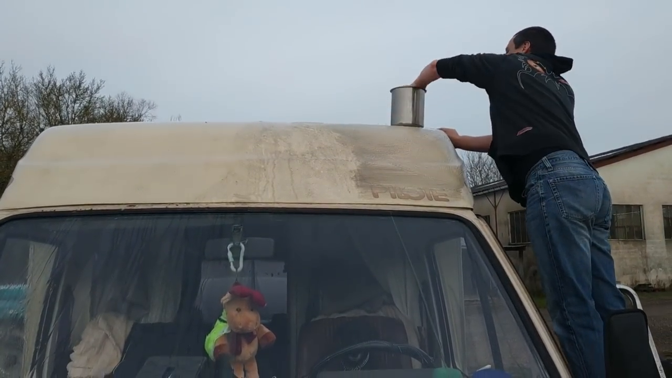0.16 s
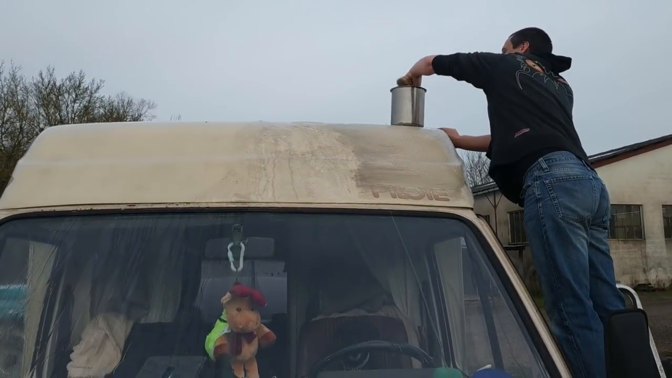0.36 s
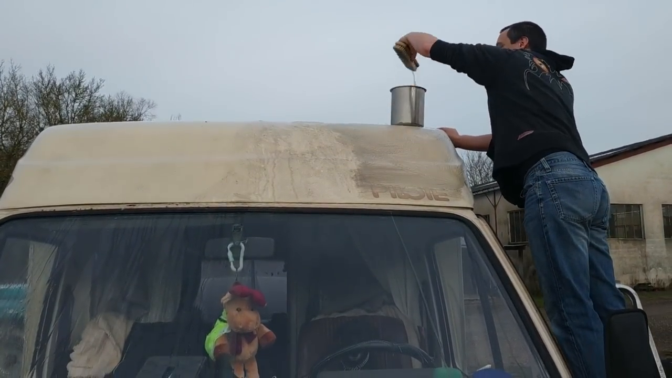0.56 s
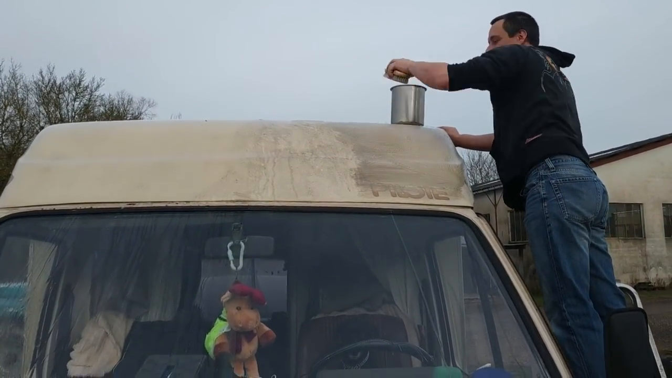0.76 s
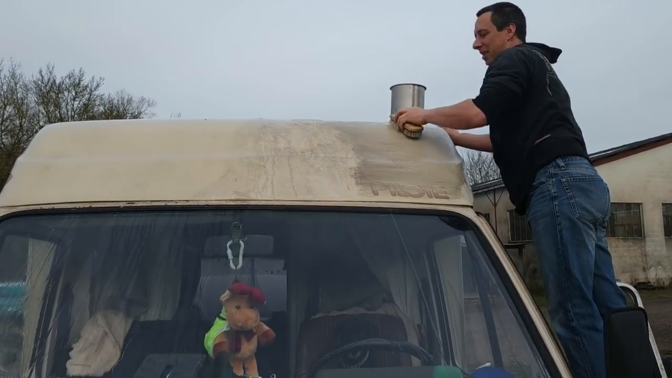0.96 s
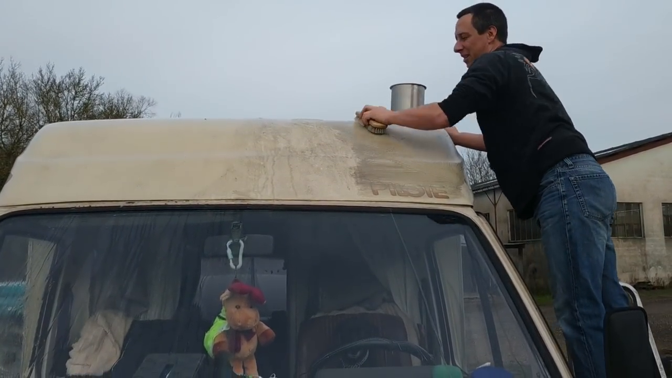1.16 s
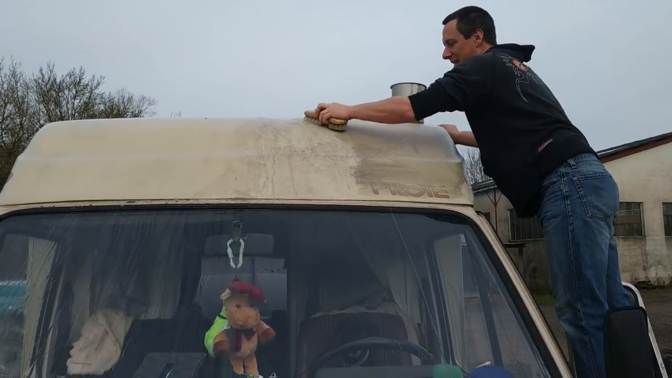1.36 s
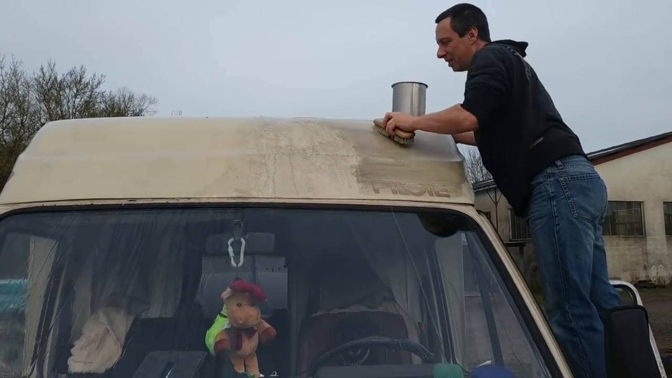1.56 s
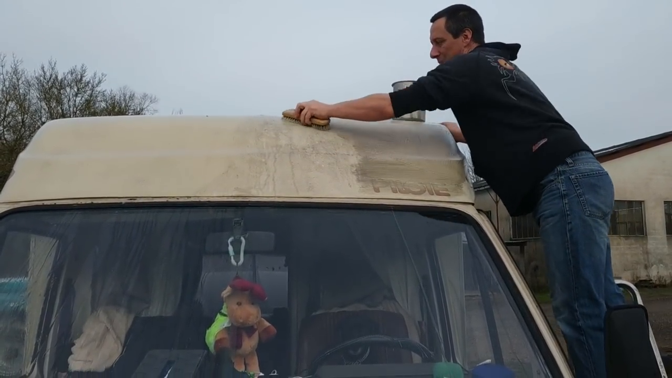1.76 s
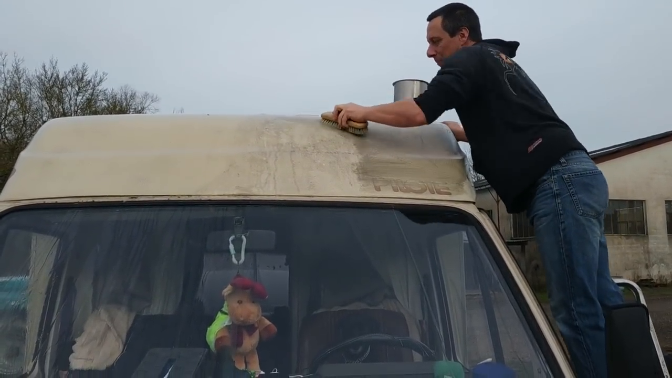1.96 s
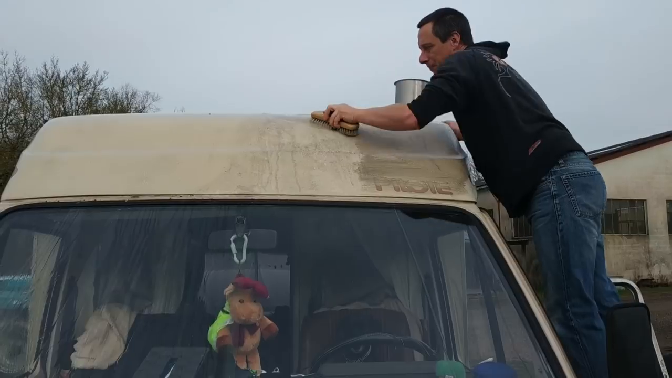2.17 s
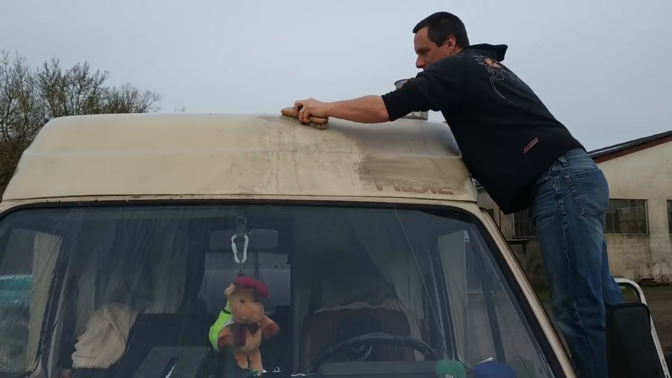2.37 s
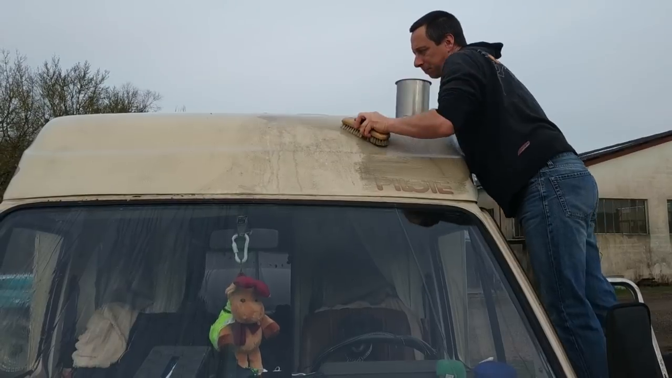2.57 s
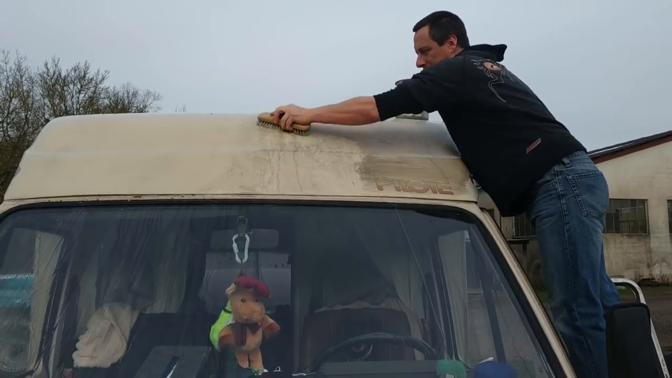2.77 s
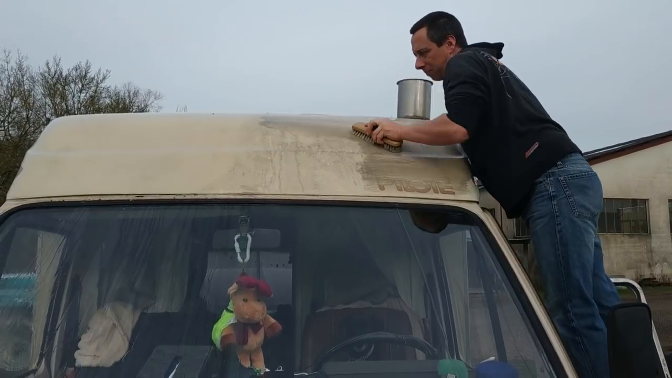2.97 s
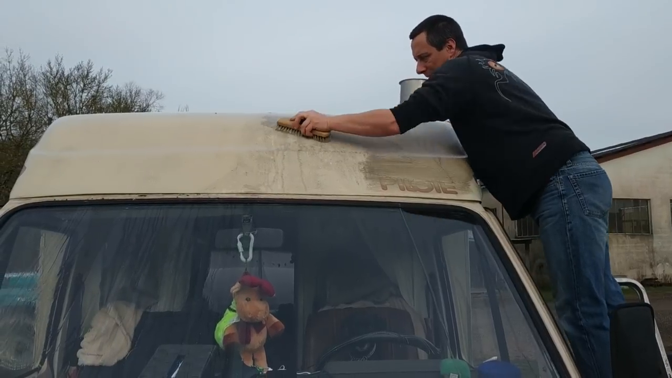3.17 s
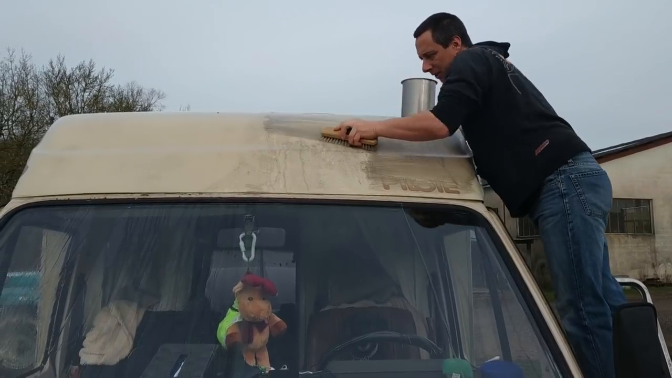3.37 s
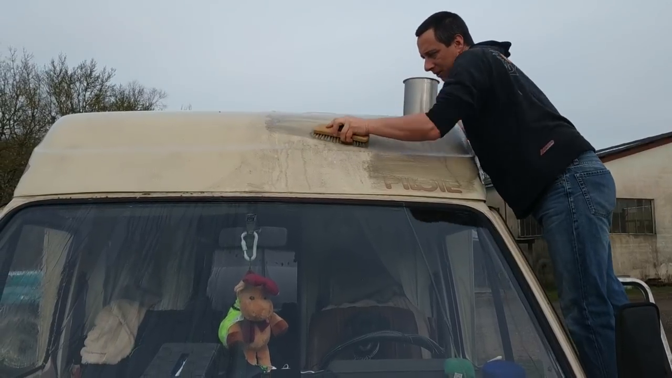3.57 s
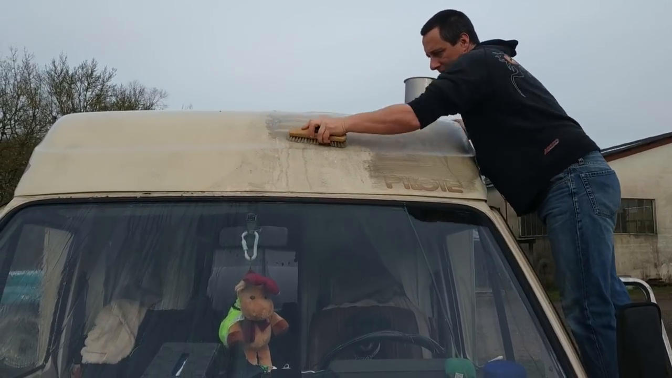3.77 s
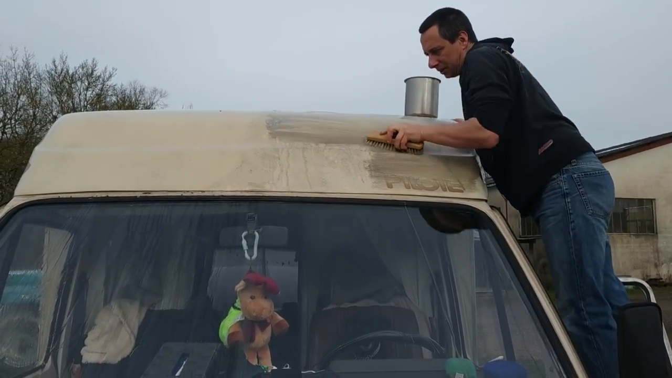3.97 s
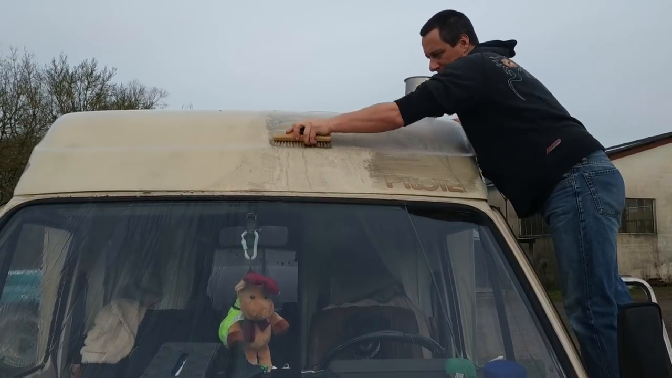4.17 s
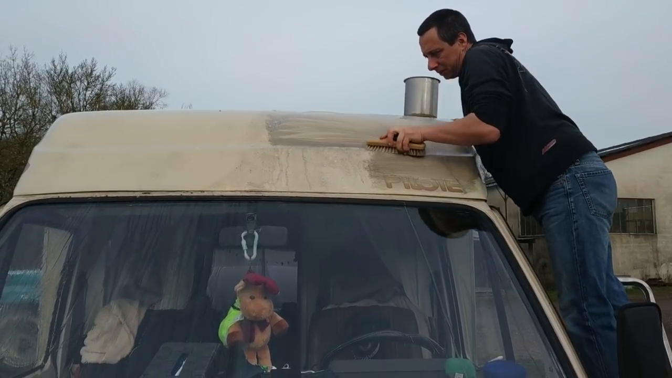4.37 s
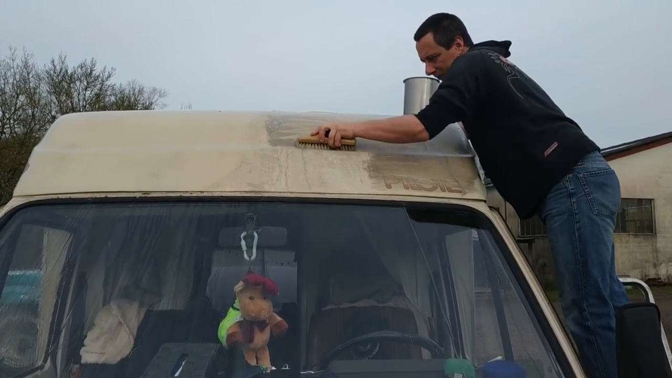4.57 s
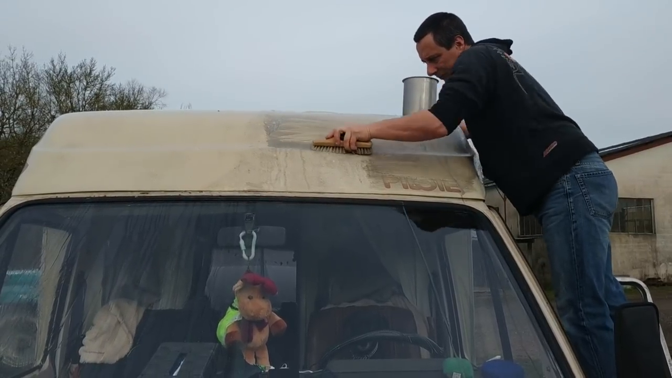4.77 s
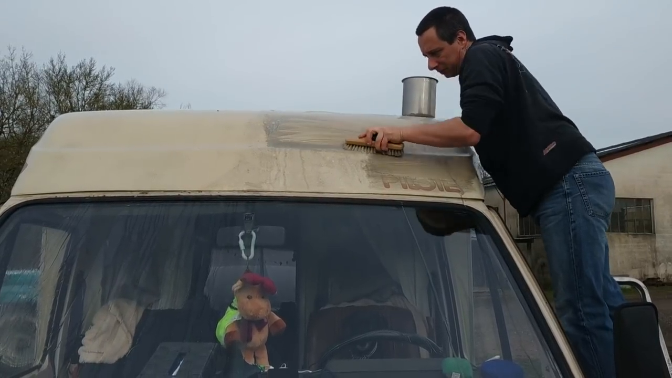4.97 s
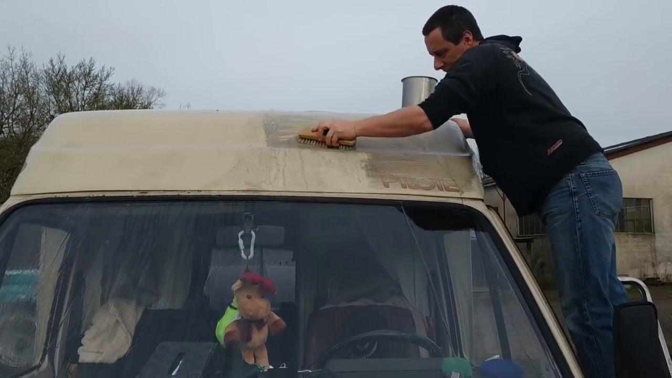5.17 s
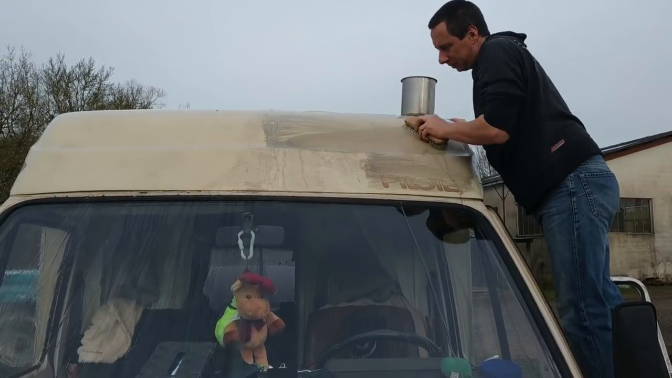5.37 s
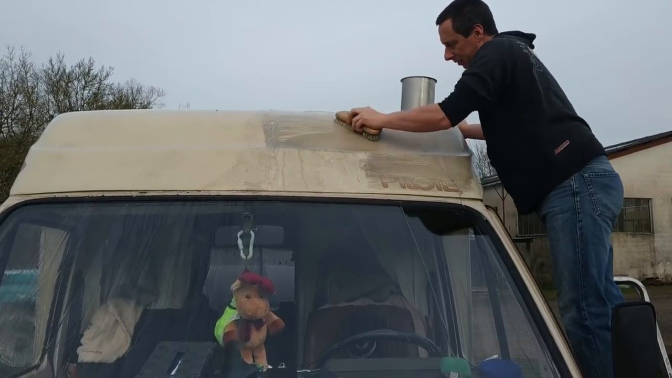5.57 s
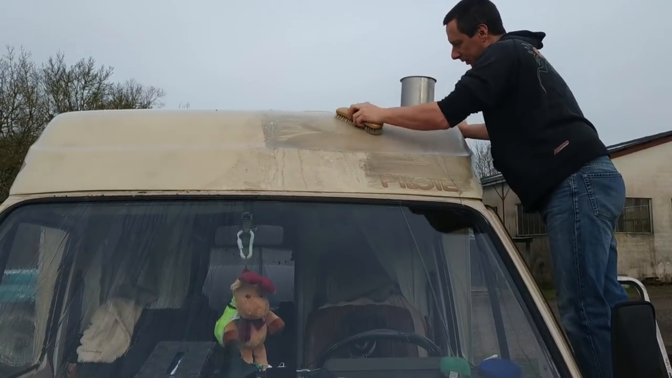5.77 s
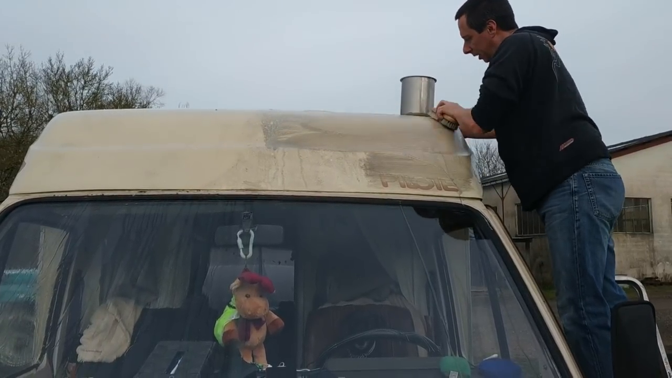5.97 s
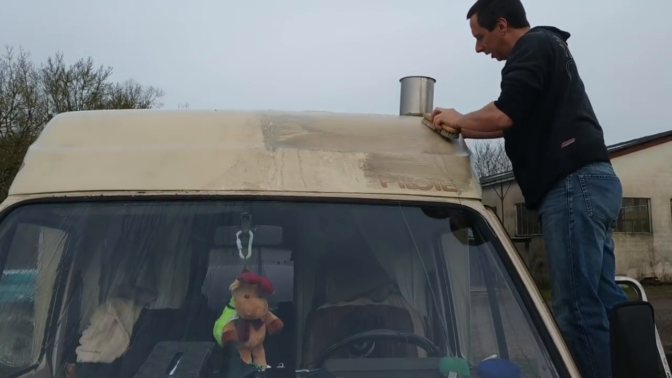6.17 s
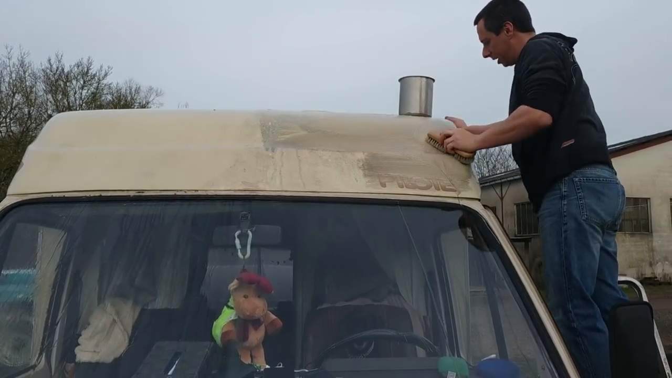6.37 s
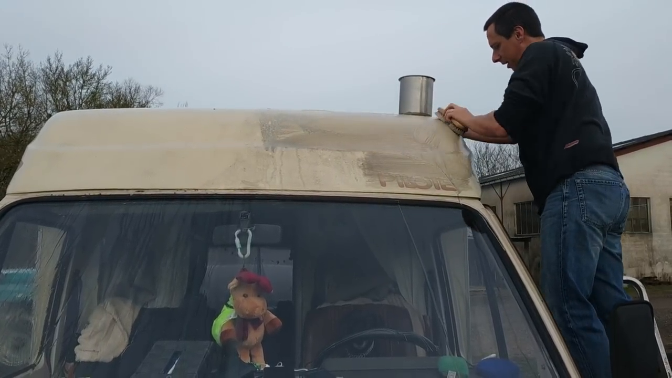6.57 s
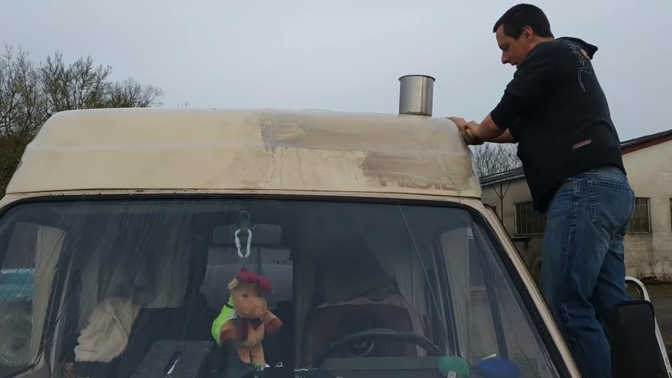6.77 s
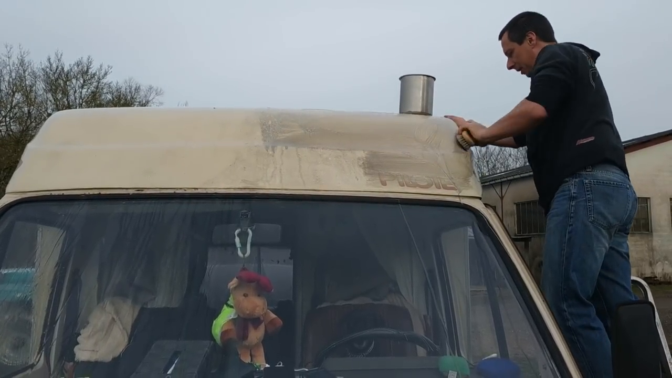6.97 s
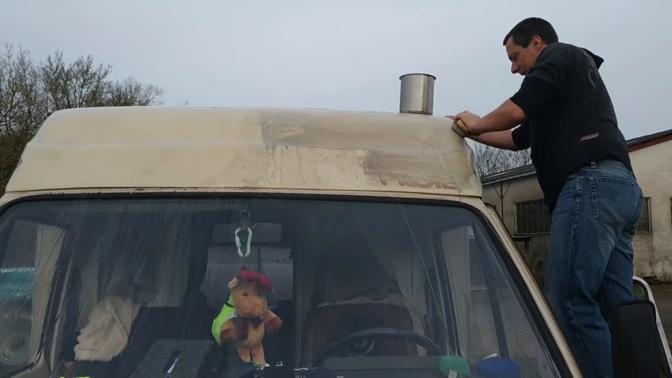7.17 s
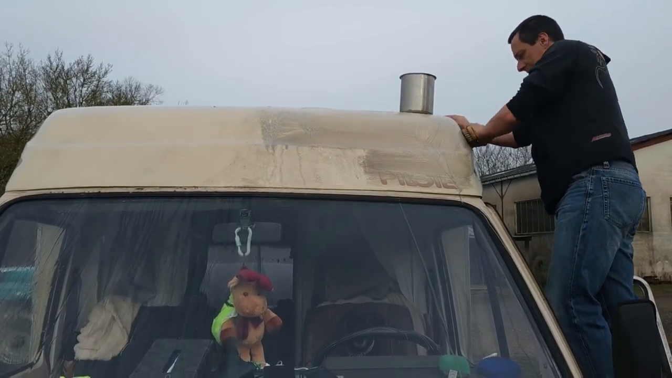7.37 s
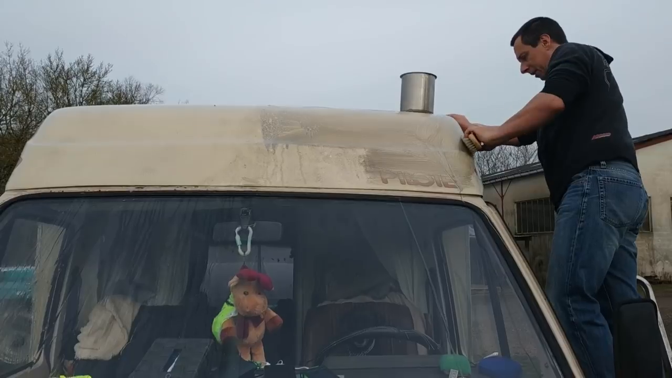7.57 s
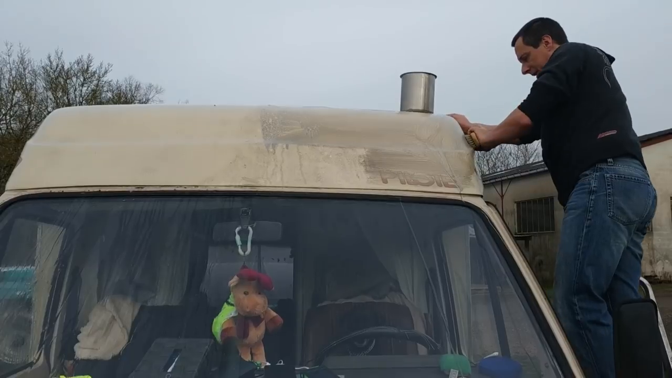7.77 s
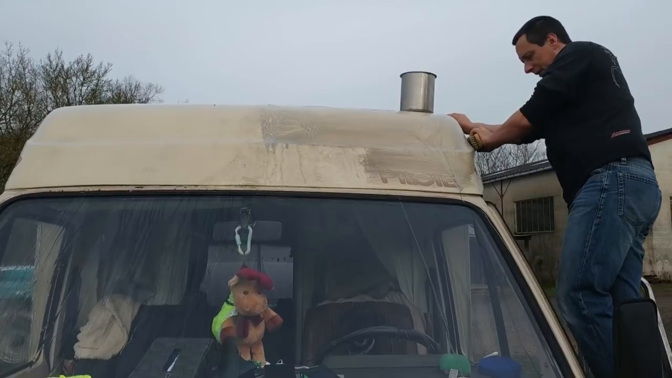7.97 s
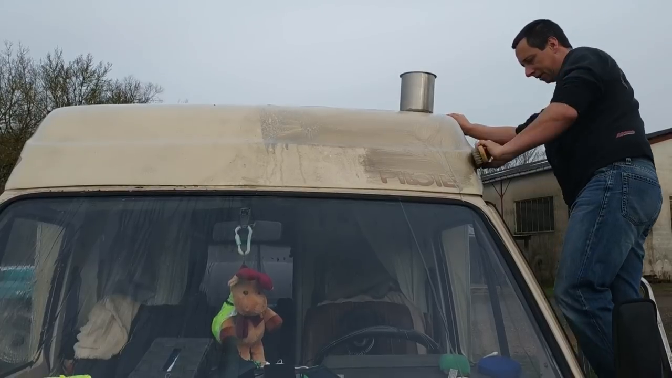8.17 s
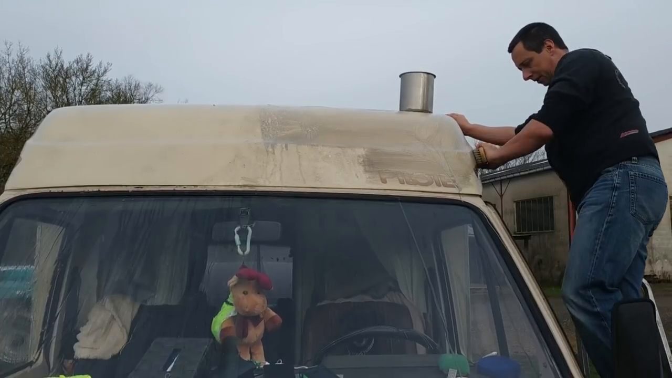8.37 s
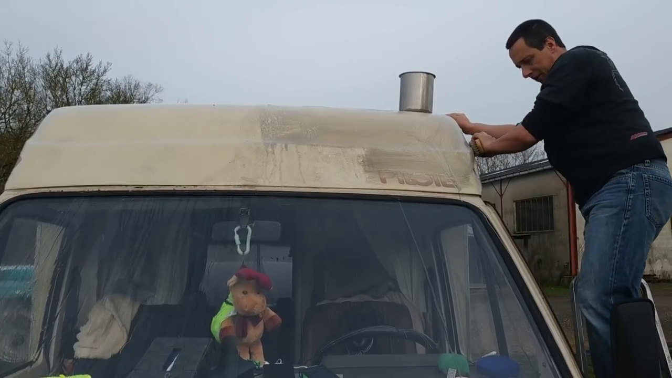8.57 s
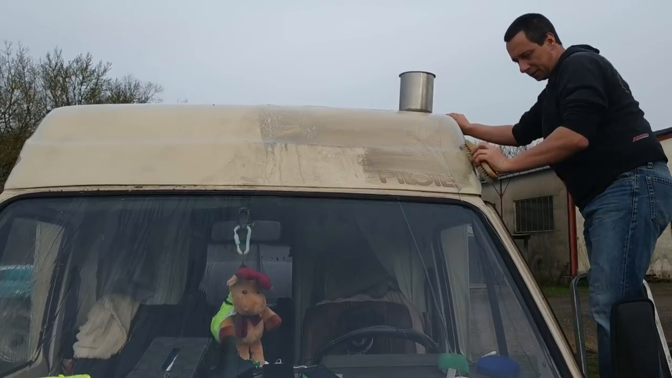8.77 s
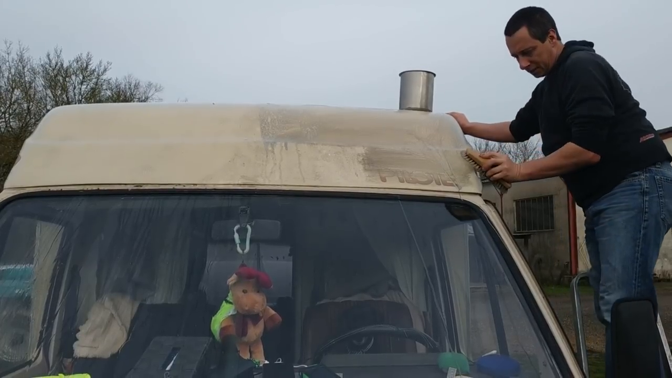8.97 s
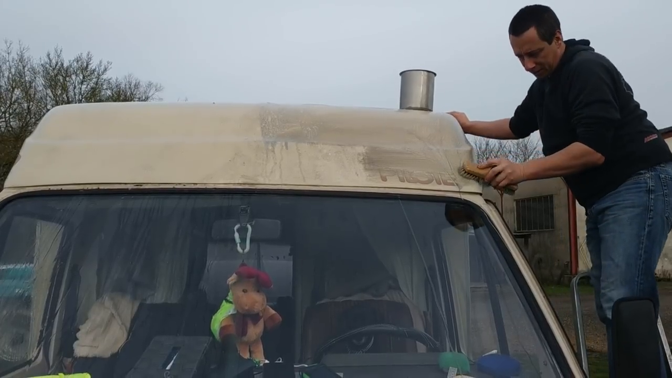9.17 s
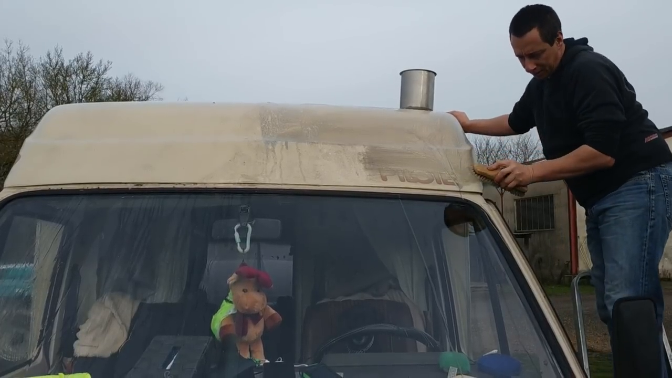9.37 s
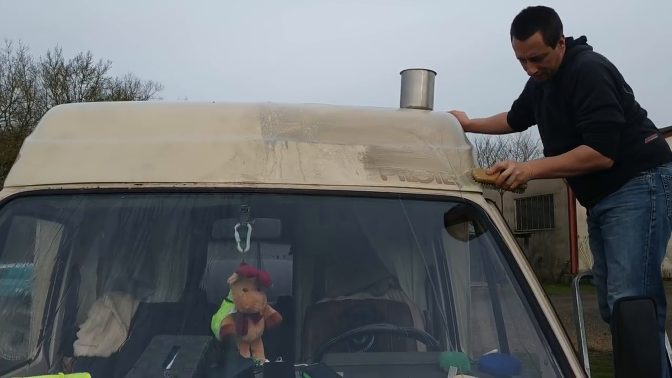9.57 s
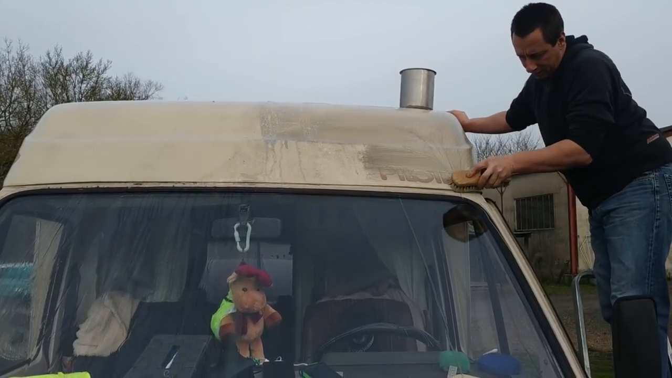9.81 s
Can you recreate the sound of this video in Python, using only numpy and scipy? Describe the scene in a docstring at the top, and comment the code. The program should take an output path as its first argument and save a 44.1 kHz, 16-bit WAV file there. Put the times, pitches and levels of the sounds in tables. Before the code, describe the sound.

A faint, distant outdoor rumble runs throughout. From 0.3 to 0.6 seconds a brush bumps a steel pot of water: small ringing clinks, splashes, bubbly plops climbing in pitch and dull knocks through the roof; another dip comes near 0.85. At 1.0 the brush lands with a bristly crack and compact hollow thud. Tentative strokes grow by 1.7 into vigorous scrubbing, around four strokes a second until 5: bright, dense hiss, stronger on pushes, with rattling judder and hollow drumming at turns, and sharper knocks between 2.2 and 4.9. Strokes weaken after 5, and a lighter landing falls at 5.9. From 6.1 the brush works round the corner, with softer, slower, raspier strokes and less drumming. A longer, fading sweep starts at 9.0, then short, quick strokes from 9.2 finish near 9.95. Close stereo, the hiss leaning left.

```python
"""A stiff hand brush, dipped in a steel pot of water, is set down on a van's roof and scrubbed to and fro, outdoors.
Its bristles hiss as many small random flicks; after each turn they judder, and kicks ring the hollow roof's modes.
The pot rings as decaying modes, with plops that climb in pitch. The left microphone hears more of the hiss.
After about six seconds the brush goes round to the roof's corner. A soft, distant rumble of noise lies beneath."""
import sys
import numpy as np
from scipy import signal
from scipy.fft import rfft, irfft, next_fast_len
from scipy.io import wavfile
from scipy.ndimage import uniform_filter1d, map_coordinates

SR = 44100
rng = np.random.default_rng(int(sys.argv[2]) if len(sys.argv) > 2 else 0)


def file_out(sig):
    """Save sig as 16-bit WAV at sys.argv[1]."""
    # one column per channel
    cols = np.atleast_2d(sig).T
    # limit, then scale
    lim = np.clip(cols, -1, 1)
    pcm = np.round(lim * 32767).astype(np.int16)
    wavfile.write(sys.argv[1], SR, pcm)


N = 433944

# strokes of the brush, pushed away and pulled back in turn:
# start_s, hiss_db (before the swell), speed_up_s, slow_down_s, judder_db (after the turn), judder_length_s
BRUSH_STROKES = [(1.143, -24, 0.093, 0.044, -43.5, 0.38), (1.464, -25, 0.041, 0.04, -37, 0.065),
                 (1.708, -21.5, 0.044, 0.065, -41, 0.14), (2.001, -19.5, 0.095, 0.053, -37, 0.088),
                 (2.228, -19.0, 0.038, 0.075, -33, 0.057), (2.464, -19.0, 0.086, 0.064, -32, 0.056),
                 (2.704, -17.5, 0.026, 0.077, -31, 0.042), (2.934, -19, 0.082, 0.057, -30.5, 0.057),
                 (3.174, -19, 0.031, 0.049, -32.5, 0.047), (3.393, -18.5, 0.071, 0.046, -35, 0.14),
                 (3.628, -18.5, 0.021, 0.085, -35.5, 0.041), (3.868, -20, 0.069, 0.046, -32.5, 0.11),
                 (4.101, -19.5, 0.044, 0.054, -36.5, 0.051), (4.345, -19.5, 0.088, 0.067, -33, 0.11),
                 (4.579, -21, 0.045, 0.054, -40, 0.17), (4.824, -19.5, 0.087, 0.077, -31, 0.083),
                 (5.074, -22.5, 0.03, 0.041, -35, 0.052), (5.275, -25.5, 0.046, 0.055, -37, 0.13),
                 (5.585, -22, 0.019, 0.032, -38, 0.028), (5.829, -25.5, 0.034, 0.062, -29.5, 0.05),
                 (6.17, -26, 0.15, 0.061, -47, 0.18), (6.491, -29, 0.054, 0.031, -37, 0.11),
                 (6.908, -26, 0.087, 0.042, -39.5, 0.17), (7.196, -27, 0.051, 0.027, -36.5, 0.056),
                 (7.476, -24.5, 0.063, 0.05, -34.5, 0.09), (7.757, -20, 0.12, 0.11, -37.5, 0.22),
                 (8.068, -26.5, 0.079, 0.05, -42.5, 0.1), (8.378, -23.5, 0.084, 0.1, -37, 0.078),
                 (8.688, -27.5, 0.037, 0.0099, -40.5, 0.083), (9.024, -22, 0.033, 0.34, -39.5, 0.017),
                 (9.222, -24, 0.054, 0.04, -49.5, 0.14), (9.384, -19, 0.094, 0.15, -55, 0.05),
                 (9.526, -23, 0.072, 0.04, -45.5, 0.085), (9.66, -24.5, 0.09, 0.067, -46.5, 0.059),
                 (9.799, -25, 0.073, 0.05, -52.5, 0.05)]
# the brush lands on the roof: start_s, thud_db, bristle_crack_db, bristle_bounce_hz
ROOF_LANDINGS = [(1.033, -17, -24.5, 287), (5.862, -27.5, -26, 450)]
# spectrum of the roof's dense upper modes: frequency_hz, level_db (per Hz, relative)
PANEL_SPECTRUM = [(110, -60), (280, -5.5), (450, 2.5), (560, 2), (720, 0), (1000, 1), (1400, 3),
                  (2000, -2.5), (2450, -7), (3000, -9.5), (4000, -5), (7000, -4.5), (15000, -52)]
# likeness of the brush's sound at the two microphones: frequency_hz, coherence (0 to 1)
BRUSH_COHERENCE = [(300, 0.61), (1400, 0.71), (2500, 0.2), (3500, 0.45), (4300, 0.096), (8000, 0.046)]
CORNER_S = 6.1  # from here on the strokes go round the corner
LAST_TURN_S = 9.95  # end of the last stroke


def amp(db):
    """Decibels to gain."""
    return 10 ** (np.asarray(db) / 20)


def unit(x):
    """x at rms 1."""
    return x / np.sqrt(np.mean(x ** 2) + 1e-20)


def along(points, hz):
    """Points of frequency and value, read on a log frequency axis."""
    f, v = np.transpose(points)
    return np.interp(np.log(hz + 1), np.log(f + 1), v)


def curve(points):
    """Points of time in seconds and value, as one value per sample."""
    return np.interp(np.arange(N) / SR, *np.transpose(points))


def wobble(rate):
    """A smooth random curve with rate knots a second."""
    knots = rng.standard_normal(int(N * rate / SR) + 4)
    return map_coordinates(knots, [np.arange(N) * rate / SR])


def delayed(x, delay_s):
    """x after a delay that may change with time."""
    return map_coordinates(x, [np.arange(N) - SR * delay_s])


def filtered(x, response):
    """x times a response of frequency."""
    size = x.shape[-1]
    padded = next_fast_len(size + 8192)  # room for the filter's tail
    return irfft(rfft(x, padded) * response(np.fft.rfftfreq(padded, 1 / SR)), padded)[..., :size]


def coloured(x, points):
    """x shaped by a spectrum of frequency_hz and level_db, at rms 1."""
    return unit(filtered(x, lambda hz: amp(along(points, hz))))


def low_cut(hz, order):
    """A causal high-pass filter."""
    return signal.butter(order, hz, "high", fs=SR, output="sos")


def paired(x, alike):
    """Two unrelated signals mixed into left and right of a given coherence."""
    turn = lambda hz: np.arccos(np.clip(along(alike, hz), -1, 1)) / 2
    mid, side = filtered(x, lambda hz: np.array([np.cos(turn(hz)), np.sin(turn(hz))]))
    return np.array([mid + side, mid - side])


def flicks(rate, spread_db):
    """Randomly timed impulses of uneven size and either sign, rate a second, at rms 1."""
    happens = rng.random(N) < rate / SR
    sign = rng.choice([-1, 1], N)
    size = amp(spread_db * np.clip(rng.standard_normal(N), -2, 2))
    return unit(happens * sign * size)


def ring(modes, t):
    """Decaying modes after one blow, with peak 1."""
    x = sum(amp(db - 60 * t / t60) * np.sin(2 * np.pi * hz * t) for hz, db, t60 in modes)
    return x / np.abs(x).max()


def add(track, s, sound):
    """Mix a sound into a track at s seconds."""
    part = track[..., round(s * SR):][..., :sound.shape[-1]]
    part += sound[..., :part.shape[-1]]


def outdoors():
    """A soft, distant rumble: steady coloured noise, more alike at the two microphones in the lows."""
    # spectrum of the rumble and air: frequency_hz, level_db (per Hz, relative)
    air_spectrum = [(30, -35), (100, -12.5), (160, -3.5), (220, 5), (290, 3), (370, -3), (700, -8),
                    (1800, -9), (3000, -21), (16000, -24)]
    # likeness at the two microphones: frequency_hz, coherence (0 to 1)
    air_coherence = [(240, 0.88), (500, 0.55), (950, 0)]
    # rumble level, before the slight lean to the left: time_s, level_db
    rumble_level = [(0, -51), (.4, -49.5), (9.8, -54)]
    rumble = coloured(paired(rng.standard_normal((2, N)), air_coherence), air_spectrum)
    return amp(curve(rumble_level)) * rumble * amp([[.6], [-.6]])


def roof_blow(t, low_hz=142):
    """The hollow roof's answer to one kick, with peak 1; a panel radiates little deep bass."""
    # low modes of the roof: frequency_hz, level_db, t60_s
    roof_modes = [(171.3, -9, 0.18), (204, 1.5, 0.22), (251.6, 2.5, 0.17), (296, 2.5, 0.11),
                  (359, -10, 0.12), (435, -1, 0.13), (506, -14.5, 0.24)]
    x = signal.sosfilt(low_cut(low_hz, order=6), ring(roof_modes, t))
    return x / np.abs(x).max()


def plop(hz, t, bubble_t60=0.062, rise=2.4, onset=0.0035):
    """A bubble breaks loose; its pitch climbs as it nears the surface."""
    tone = np.sin(2 * np.pi * hz * (t + rise * t ** 2 / 2))
    return tone * amp(-60 * t / bubble_t60) * (1 - np.exp(-t / onset))


def dipping(splash_db=-11.0, splash_t60=0.31, tick_db=-8, tick_t60=0.032):
    """The brush bumps the pot, which passes the knock on to the roof, and plops in the water."""
    # bumps against the pot: start_s, pot_ring_db (before the lean to the left), roof_knock_db
    bumps = [(.343, -37, -31), (.492, -32, -40), (.531, -35.5, -61), (.581, -41, -54), (.848, -41.5, -58)]
    # bubbles around the brush: start_s, level_db, pitch_hz (at the start of the rise)
    bubbles = [(0.344, -23, 440), (.495, -27, 497), (.576, -29, 423), (.591, -28.5, 460),
               (.859, -31.5, 526)]
    # modes of the pot with water in it: frequency_hz, level_db (varied a little per bump), t60_s
    pot_modes = [(598, 2.5, 0.22), (983, -0.5, 0.14), (1207, -4, 0.16), (1690, -6, 0.16), (1860, -5, 0.12)]
    splash_spectrum = [(200, -32), (500, 3), (1800, 0), (3200, -19), (12000, -26)]  # Hz, dB
    out, t = np.zeros((2, N)), np.arange(SR // 3) / SR
    for s, pot_db, knock_db in bumps:
        pot = ring([(hz, db + rng.normal(0, 2), t60) for hz, db, t60 in pot_modes], t)
        splash = coloured(rng.standard_normal((2, len(t))), splash_spectrum)
        decay = amp(splash_db - 60 * t / splash_t60) + amp(tick_db - 60 * t / tick_t60)
        steel = (pot + splash * decay) * amp([[1.5], [-1.5]])
        add(out, s, amp(knock_db) * roof_blow(t) + amp(pot_db) * steel)
    for s, db, hz in bubbles:
        add(out, s, amp(db) * plop(hz, t))
    return out


def landing(crack_t60=0.027, push_s=0.017, press_s=0.0022):
    """The brush drops onto the roof: a crack of bristles and a compact, hollow thud."""
    crack_spectrum = [(300, -5), (2000, 5), (3300, -4), (5000, -5.5), (15000, -8.0)]  # Hz, dB
    out, t = np.zeros((2, N)), np.arange(SR // 3) / SR
    for s, thud_db, crack_db, push_hz in ROOF_LANDINGS:
        # the springy bristles shake the panel briefly at their own bounce rate, while its modes ring on
        push = np.sin(2 * np.pi * push_hz * t) * np.exp(-np.square(t / push_s) ** 2)
        pressed = (push + roof_blow(t)) * (1 - np.exp(-t / press_s))
        thud = signal.sosfilt(low_cut(140, order=2), pressed)
        crack = coloured(rng.standard_normal((2, len(t))), crack_spectrum) * amp([[0], [-9]])
        add(out, s, amp(thud_db) * thud + amp(crack_db - 60 * t / crack_t60) * crack)
    return out


def strokes():
    """For each sample: the stroke's number, the time since its turn and the time until the next."""
    t = np.arange(N) / SR
    turns = np.append(np.transpose(BRUSH_STROKES)[0], LAST_TURN_S)
    k = np.clip(np.searchsorted(turns, t) - 1, 0, len(BRUSH_STROKES) - 1)
    return k, np.maximum(t - turns[k], 0), np.maximum(turns[k + 1] - t, 0)


def place(reach=0.98):
    """The brush's way over the roof: a push carries it reach places from the edge, a pull brings it back."""
    # where the brush is with the arm drawn in: time_s, place (0 top, 1 edge, 2 corner)
    drawn_in = [(5.3, 1.36), (6.1, 1.7), (6.6, 1.4), (7.1, 1.47)]
    stroke, since, until = strokes()
    extension = (1 - np.cos(np.pi * (stroke + since / (since + until)))) / 2
    before_corner = np.transpose(BRUSH_STROKES)[0][stroke] < CORNER_S
    return np.minimum(curve(drawn_in), 2) - reach * extension * before_corner


def settling(resting=0.33, settle_s=0.07):
    """Share of the hand's weight on the brush: none until it lands, then growing into the first stroke."""
    t = np.arange(N) / SR
    return np.clip((t - BRUSH_STROKES[0][0]) / settle_s, resting, 1) * (t > ROOF_LANDINGS[0][0])


def sliding(power=1.44, push_swell_db=8.5, pull_swell_db=-4, corner_swell_db=-3.5):
    """Strength of the friction: the hand speeds up after each turn and brakes before the next."""
    # hiss that remains at a turn, higher where the hand loops round: time_s, level_db (re stroke)
    looping = [(1.46, -14), (1.7, -20), (5.2, -19.5), (5.55, -8.5), (6.17, -25), (6.48, -7), (7.76, -24),
               (9.03, -18), (9.2, -26.5), (9.8, -19)]
    t = np.arange(N) / SR
    start, hiss_db, speed_up, slow_down = np.transpose(BRUSH_STROKES)[:4]
    k, since, until = strokes()
    speed = np.tanh(since / speed_up[k]) * np.tanh(until / slow_down[k])
    # the arm leans into a push and eases off in a pull; round the corner both directions fade
    to_and_fro_db = np.take((push_swell_db, pull_swell_db), k % 2)
    swell_db = np.where(start[k] < CORNER_S, to_and_fro_db, corner_swell_db)
    pressure = amp(hiss_db[k] + swell_db * (since / (since + until) - .5))
    # some bristles keep moving even while the hand turns
    turning = amp(np.interp(t, start, hiss_db) + curve(looping))
    return settling() * np.hypot(pressure * speed ** power, turning)


def rippled(x, first_s=.0011, longer=1.55, drift_s=.00005, echo_db=-13.0):
    """Add four weak echoes with randomly drifting delays, so uneven ripples move in the hiss."""
    echoes = 0
    for k in range(4):
        echoes = echoes + np.array([delayed(channel, first_s * longer ** k + drift_s * wobble(3))
                                    for channel in x])
    return x + amp(echo_db) * echoes


def patchy(x, depth_db, width_hz=1100, length_s=.025):
    """Random patches of gain in time and frequency, rms 1: the hiss is slightly uneven."""
    hz, t, z = signal.stft(x, SR, nperseg=256)
    knots = rng.standard_normal((int(hz[-1] / width_hz) + 4, int(t[-1] / length_s) + 4))
    field = map_coordinates(knots, np.meshgrid(hz / width_hz, t / length_s, indexing="ij"))
    return unit(signal.istft(z * amp(depth_db * field), nperseg=256)[1][:N])


def bristles(friction, far_db=-15, uneven_db=0.33, patch_db=1.48):
    """Thousands of bristle tips flick over the wet paint; the colour follows the brush's place on the roof."""
    # bristle hiss: frequency_hz, left_from_top_db, left_from_edge_db, left_from_corner_db,
    # right_shaded_db (all relative within their column)
    hiss_spectra = [(900.0, -28, -34.5, -58, -35.5), (2130, -9.5, -16.5, -8, -20.0),
                    (2730, -33, -18, -6.5, -20), (3340, -10.5, -10, -9.5, -8.5),
                    (3820, -3.5, -9.5, -1.5, -11), (4780, -1.0, -1.5, -5.5, -18.5),
                    (6700, -7.5, -7, 1, -17), (7000.0, -8, -8.5, -4, -22), (7620, 2.5, 0, -2.5, -18.5),
                    (8130, 0, -1, -14.5, -17.0), (8890, 3.5, 5, 1, -14.5), (9960, -2, 2.5, 8.5, -19.5),
                    (10760, 0.0, -1.0, 7.5, -16), (11470, 8, 4.5, -7.5, -19), (13040, -1, 5, 2.5, -17),
                    (13800, -8.5, 0, -6.5, -14.5), (14800.0, -7, 4.5, -5, -20.5),
                    (15700.0, -7.5, -2.0, -8, -15.5)]
    hz, *near_spectra, far_spectrum = np.transpose(hiss_spectra)
    tips = np.array([flicks(rate=9000, spread_db=1.5) for _ in range(2)])
    left, right = rippled(paired(tips, BRUSH_COHERENCE))
    where = place()
    near = 0
    for k, db in enumerate(near_spectra):  # cross-fade between top, edge and corner
        near = near + np.maximum(1 - abs(where - k), 0) * coloured(left, np.c_[hz, db])
    far = coloured(right, np.c_[hz, far_spectrum])
    grip = amp(uneven_db * wobble(17))  # whole tufts catch and let go together
    return friction * grip * np.array([patchy(near, patch_db), amp(far_db) * patchy(far, patch_db)])


def judder(friction, grab_s=0.01, rub_db=-23.5, rub_s=0.042):
    """Strength of rattle and drumming: a little from all sliding, more when bristles flip, brake or catch."""
    # how freely the roof drums beneath the brush; the corner and its pillar are stiff: time_s, gain_db
    hollow_gain = [(5.4, 1), (5.57, -5), (5.85, -0.5), (6.25, -29), (6.45, -1), (7.05, -8), (7.45, -0.5),
                   (8.0, -6), (8.75, 1), (9.1, -20)]
    # the bristles catch during a stroke: start_s, judder_db, length_s
    catches = [(3.065, -34.5, 0.029), (3.316, -33, 0.036), (3.95, -29, 0.045), (4.243, -37.5, 0.066),
               (4.408, -31.5, 0.042), (5.549, -38.5, 0.027), (6.28, -39.5, 0.046), (6.431, -40, 0.066),
               (7.006, -40, 0.091), (7.387, -43, 0.11), (8.539, -43.5, 0.12)]
    # push, pull: delay before the stuck bristles flip (s), drumming over rattle (dB), steady chatter (dB)
    flip_s, flip_drum_db, chatter_db = (0.017, 0.026), (0.5, -2), (-27.5, -31)
    # braking judder: time before the turn (s), level re friction (dB), length (s)
    brake_s, brake_db, brake_length_s = 0.059, -25.5, 0.11
    brake_drum_db, chatter_drum_db = -1.5, -5  # drumming over rattle: braking or catching, and sliding
    stroke, since, until = strokes()
    t = np.arange(SR) / SR
    bursts = [(*catch, brake_drum_db) for catch in catches]
    for k, (s, *_, db, length) in enumerate(BRUSH_STROKES):
        bursts.append((s + flip_s[k % 2], db, length, flip_drum_db[k % 2]))
    for turn_s, *_ in BRUSH_STROKES[1:]:
        s = turn_s - brake_s
        db = 20 * np.log10(friction[round(s * SR)]) + brake_db
        bursts.append((s, db, brake_length_s, brake_drum_db))
    chatter = amp(np.take(chatter_db, stroke % 2)) * friction
    power = np.outer(amp([0, chatter_drum_db]), chatter) ** 2  # rows: rattle, drumming
    for s, db, length, drum_db in bursts:
        burst = (1 - np.exp(-t / grab_s)) * np.exp(-(t / length) ** 2)
        add(power, s, np.outer(amp([db, db + drum_db]), burst) ** 2)
    # around each turn the stuck bristles rub the roof with a low sound
    effort = uniform_filter1d(friction, SR // 2)
    near_turn = np.exp(-(np.minimum(since, until) / rub_s) ** 2)
    power[1] += (amp(rub_db) * effort * near_turn) ** 2
    rattle, drum = np.sqrt(power * settling())
    return rattle, drum * amp(curve(hollow_gain))


def roof(rattle, drum, rattle_db=2, panel_t60=0.058, direct=0.35, rasp_hz=2300, rasp_q=2.5, rasp_db=1.0,
         bend_s=0.00416):
    """Tufts stick and slip; their kicks rattle the panel and drum its low modes."""
    # shade of the rattle at the right microphone: frequency_hz, gain_db
    right_shade = [(700, 0), (1400, -1.5), (2200, -3.5), (3500, 3), (6000, -13.5)]
    t = np.arange(SR // 5) / SR
    panel = np.zeros((2, N))
    for _ in range(5):  # every spot under the brush stirs the dense modes differently
        answer = rng.standard_normal((2, len(t))) * amp(-60 * t / panel_t60)
        answer /= np.linalg.norm(answer, axis=1, keepdims=True)
        answer[0, 0] += direct  # each kick is heard before the panel rings on
        kicks = flicks(rate=250, spread_db=3.0)[None]
        panel += signal.oaconvolve(kicks, answer, axes=1)[:, :N]
    left, right = coloured(paired(panel, BRUSH_COHERENCE), PANEL_SPECTRUM)
    # the rasp, fixed near 2300 Hz, grows louder from the top towards the corner
    rasp = amp(rasp_db) * place() * signal.lfilter(*signal.iirpeak(rasp_hz, rasp_q, fs=SR), left)
    shaded = filtered(right, lambda hz: amp(along(right_shade, hz)))
    panel = np.array([left + rasp, shaded])
    drumming = signal.oaconvolve(flicks(rate=400, spread_db=3), roof_blow(t))[:N]
    # the hand's shifting weight bends the low modes in pitch, as a swing of delay
    hollow = unit(delayed(drumming, bend_s * wobble(4)))
    return amp(rattle_db) * rattle * panel + drum * hollow * amp([[.4], [-.4]])


def knocking(clack_db=-9, clack_t60=0.069):
    """In some turns the tufts flip all at once and knock the roof: its low modes and a short clack."""
    # knocks: start_s, level_db
    knocks = [(2.258, -35), (2.734, -32), (3.203, -29.5), (4.382, -27.5), (4.609, -31), (4.857, -35)]
    out, t = np.zeros((2, N)), np.arange(SR // 3) / SR
    for s, db in knocks:
        noise = paired(rng.standard_normal((2, len(t))), BRUSH_COHERENCE)
        clack = coloured(noise, PANEL_SPECTRUM) * amp(clack_db - 60 * t / clack_t60)
        add(out, s, amp(db) * (roof_blow(t) + clack))
    return out


def from_brush(x, shared_hz=3510, width_hz=360):
    """Sound reaches the right microphone later as the brush nears the corner; both hear one narrow band alike."""
    # extra delay to the right microphone: place (0 top, 1 edge, 2 corner), delay_s
    right_lag = [(0, 0.000004), (0.5, 0.000054), (1, 0.00013), (2, 0.00014)]
    band = lambda hz: np.exp(-np.square((hz - shared_hz) / width_hz) ** 2)
    left, right = x + filtered(x.mean(axis=0) - x, band)
    return np.array([left, delayed(right, np.interp(place(), *np.transpose(right_lag)))])


def scene(snap_db=-3):
    """Pot, brush and roof in the open air."""
    friction = sliding()
    rattle, drum = judder(friction)
    scratch = np.hypot(friction, amp(snap_db) * rattle)  # chattering bristles also snap and hiss
    brush = landing() + bristles(scratch) + roof(rattle, drum) + knocking()
    return outdoors() + dipping() + from_brush(brush)


def record(dry, top_hz=15800):
    """The microphone channel passes nothing above its band limit."""
    return filtered(dry, lambda hz: hz < top_hz)


dry = scene()
out = record(dry)
file_out(out)
```